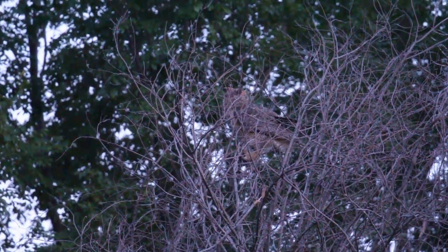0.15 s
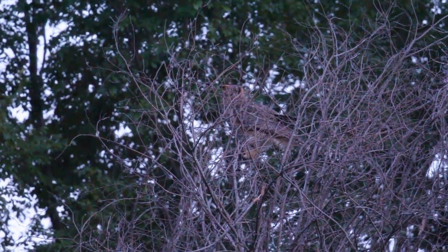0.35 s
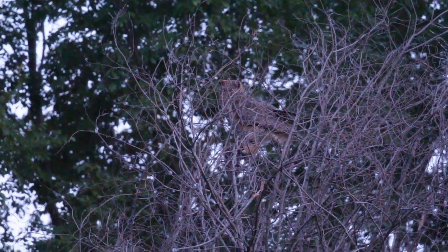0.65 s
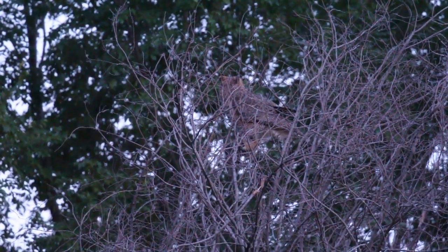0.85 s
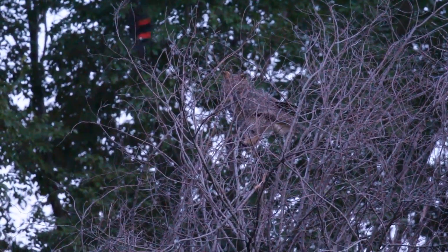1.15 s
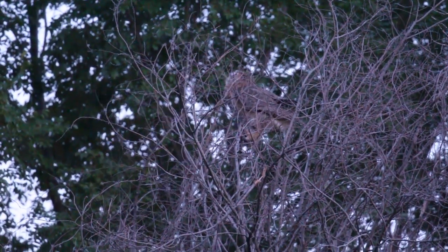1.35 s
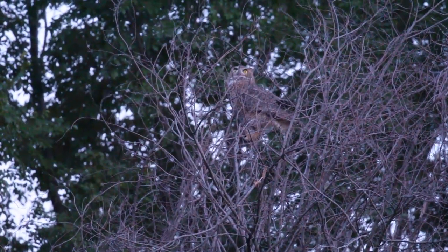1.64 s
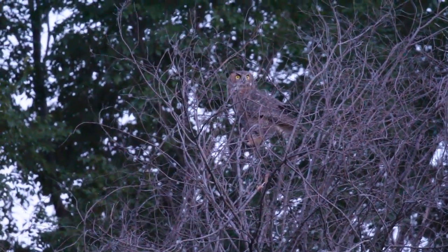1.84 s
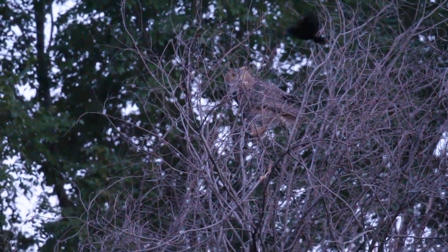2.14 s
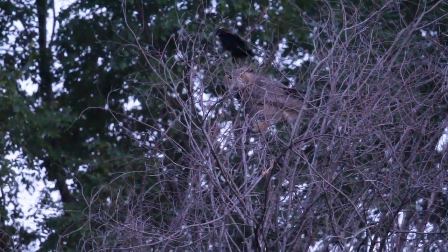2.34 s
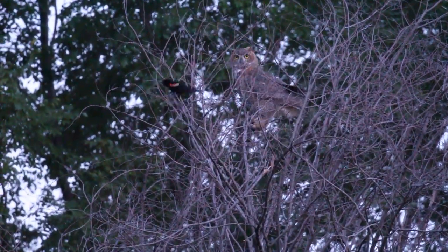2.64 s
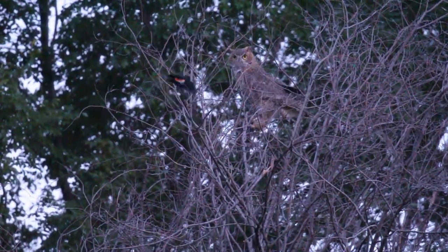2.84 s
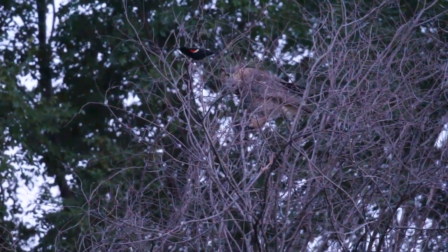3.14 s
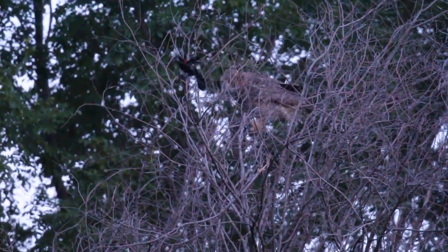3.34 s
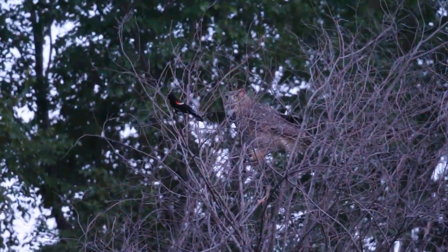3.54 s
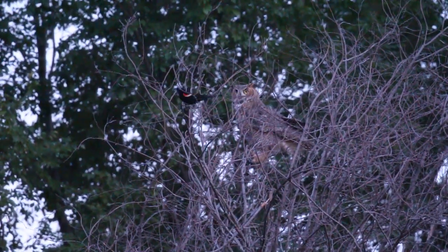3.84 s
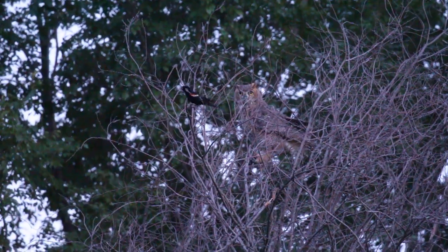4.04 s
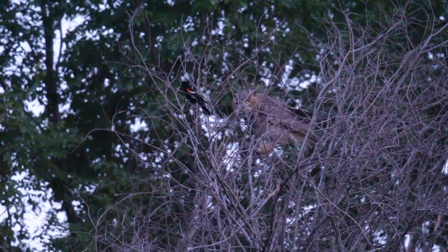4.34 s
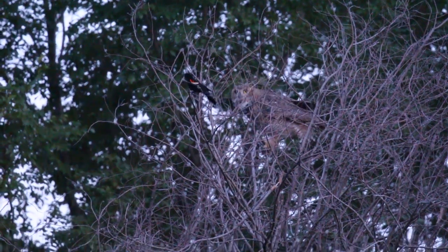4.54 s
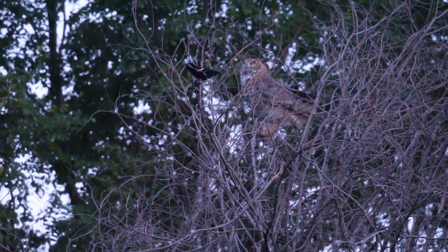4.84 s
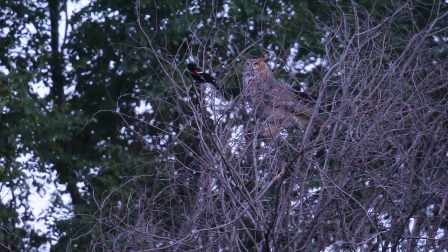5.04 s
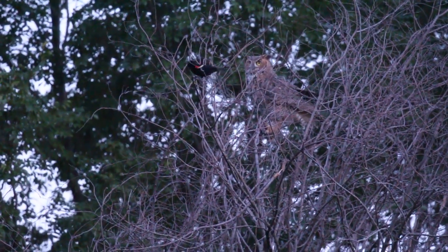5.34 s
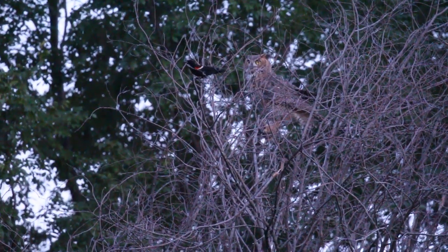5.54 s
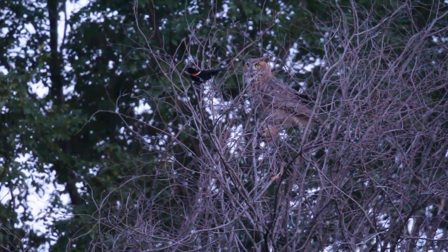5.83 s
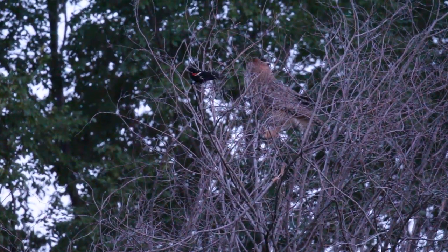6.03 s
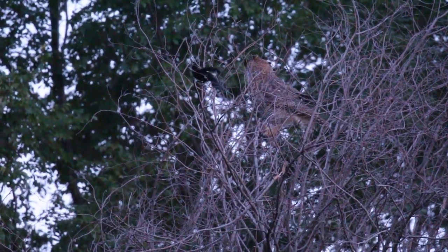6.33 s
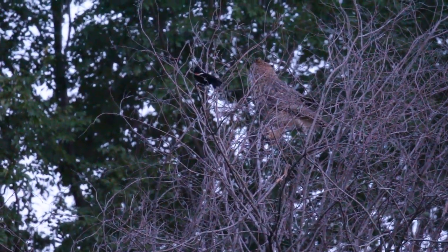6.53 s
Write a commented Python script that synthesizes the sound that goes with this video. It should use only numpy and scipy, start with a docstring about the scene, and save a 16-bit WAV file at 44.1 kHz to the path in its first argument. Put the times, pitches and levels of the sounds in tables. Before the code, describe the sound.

Sharp alarm calls from small birds keep coming in the trees, with occasional buzzy descending whistles, a thin insect trill and soft hum.

```python
"""In the trees near a town, blackbirds and robins mob an owl. Their sharp alarm chips have two voices,
one from each side of the bird's voice box. Dry chucks, thin upward zips, husky slurs and two long
buzzy falling whistles join in, all scattered by the leaves. Behind them the town hums and an insect
trills near 5 kHz with its wings. Twigs rustle, and a few short hollow knocks sound close by."""
import sys
import numpy as np
from scipy import signal
from scipy.fft import rfft, irfft
from scipy.io import wavfile
from scipy.ndimage import uniform_filter1d

SR = 44100
rng = np.random.default_rng(int(sys.argv[2]) if len(sys.argv) > 2 else 0)


def unload_wav(signal):
    """Save mono or channel-first audio to the path in sys.argv[1] as 16-bit WAV at rate SR, clipped to [-1, 1]."""
    wavfile.write(
        sys.argv[1],
        SR,
        np.round(np.clip(np.atleast_2d(signal).T, -1, 1) * 32767).astype(np.int16),
    )


N = 294588


def amp(db):
    """Turns decibels into a gain."""
    return 10 ** (np.asarray(db) / 20)


def unit(x):
    """Scales a signal to an average (rms) size of 1."""
    return x / np.sqrt(np.mean(x ** 2) + 1e-20)


def curve_at(points, hz):
    """Reads between (frequency, value) points on a log-frequency axis."""
    f, value = np.transpose(points)
    return np.interp(np.log(hz + 1), np.log(f), value)


def add(mix, start, sound):
    """Mixes a sound in at a start time in seconds."""
    part = mix[max(round(start * SR), 0):][:len(sound)]
    part += sound[:len(part)]


def play(sounds):
    """Lays (start, sound) pairs on one track."""
    track = np.zeros(N)
    for start, sound in sounds:
        add(track, start, sound)
    return track


def wander(size, hz):
    """A smooth random wobble that moves up to about hz times a second."""
    f = np.fft.rfftfreq(size + SR, 1 / SR)
    return unit(irfft(rfft(rng.standard_normal(size + SR)) * np.exp(-(f / hz) ** 2)))[:size]


def tone(hz):
    """A pure tone that follows a pitch curve."""
    return np.sqrt(2) * np.sin(2 * np.pi * (np.cumsum(hz) / SR + rng.random()))


def foliage(x, near_db, far_db, near_fade_s=.1885, far_fade_s=.736, shared=.59584):
    """Nearby leaves scatter a quick blur; trees farther off return a faint, longer echo."""
    t = np.arange(SR) / SR
    echoes = np.zeros((2, SR))
    for db, fade_s, rise_s in [(near_db, near_fade_s, .003), (far_db, far_fade_s, .03)]:
        taps = rng.standard_normal((3, SR)) * (rng.random((3, SR)) < 3000 / SR)
        taps = np.sqrt(shared) * taps[2] + np.sqrt(1 - shared) * taps[:2]  # some reach both ears
        taps *= amp(-60 * t / fade_s) * (1 - np.exp(-(t / rise_s) ** 2))
        echoes += amp(db) * taps / np.linalg.norm(taps, axis=1, keepdims=True)
    return x + signal.fftconvolve(x[None], echoes, axes=1)[:, :N]


# The hum from bass to treble: f/Hz, relative level/dB
HUM_COLOUR = [(25, -41), (42, -41), (62, -34), (115, -7.5), (160, -15.5), (260, -6.5), (500, -2.5),
              (820, -1.5), (1350, -5.5), (2000, -10.5), (3900, -12), (5600, -19.5), (8000, -26),
              (15500, -34.5)]
# How alike the two ears hear it: f/Hz, likeness (1 = the same)
HUM_LIKENESS = [(60, 1), (130, 0.8887), (290, 0.8637), (640, 0.8405), (1410, 0.6295), (3100, 0.3146),
                (6820, 0.08), (15000, 0.02373)]
# Which side is louder: f/Hz, left minus right level/dB
HUM_BALANCE = [(60, 1), (180, 0.5), (550, 1.0), (1650, 0), (4970, 0.5), (15000, -1)]

def town_hum(level_db=-46.5, patch_db=1.5):
    """Far traffic and leaves: soft noise with drifting louder patches, its bass alike in both ears."""
    frames, hz = N // 512 + 5, np.fft.rfftfreq(2048, 1 / SR)
    a, b, c, d, patches = rng.standard_normal((frames, len(hz), 5)).T
    patches = unit(uniform_filter1d(uniform_filter1d(patches, size=10, axis=0), size=10, axis=1))
    likeness = curve_at(HUM_LIKENESS, hz)[:, None]
    left = a + 1j * b
    right = likeness * left + np.sqrt(1 - likeness ** 2) * (c + 1j * d)
    lean = amp(curve_at(HUM_BALANCE, hz) / 2)[:, None]
    spectra = np.array([left * lean, right / lean])
    spectra *= amp(curve_at(HUM_COLOUR, hz)[:, None] + patch_db * patches)
    return amp(level_db) * unit(signal.istft(spectra, nperseg=2048, noverlap=1536)[1][:, :N])


# One stroke of the insect's wings: t/s, f/Hz, relative level/dB
WING_STROKE = [(0, 4900, -22), (.005, 5020, -5), (.010, 4970, -2), (.015, 4820, -2), (.019, 4690, -4),
               (.025, 4620, -24)]

def insect_trill(strokes_per_s=33.876, level_db=-50.4, flutter_db=1.8, waver=.008):
    """Each wing stroke is a short tone that sags as the wings slow down."""
    at, hz, db = np.transpose(WING_STROKE)
    strokes = (np.arange(N) / SR + .0085) * strokes_per_s + 1 / 4  # begins partway through a stroke
    t = strokes % 1 / strokes_per_s
    pitch = np.interp(t, at, hz) * (1 + waver * wander(N, 178.86))
    return amp(level_db + np.interp(t, at, db) + flutter_db * wander(N, 25.45)) * tone(pitch)


def rasp(start, length, hz, db, width_hz=650, treble_db=-24):
    """A harsh puff of noise around one pitch, as from a throat or a twig."""
    progress = np.arange(0, 1, 1 / (length * SR))
    size = len(progress)
    f = np.fft.rfftfreq(size, 1 / SR)
    peak = np.exp(-((f - hz) / width_hz) ** 2 / 2)
    treble = amp(treble_db) * np.exp(-((f - 1.3956 * hz) / hz) ** 2)
    noise = unit(irfft(rfft(rng.standard_normal(size)) * (peak + treble), size))
    return start, amp(db) * noise * unit(progress ** .9 * (1 - progress) ** 1.088)


# Rustles in the twigs: t/s, length/s, centre f/Hz, level/dB
RUSTLES = [(4.683, .015, 9500, -64), (4.76, .058, 10500, -69.5), (4.851, .028, 10490, -64.5)]

def twig_rustles():
    """Dry twigs give brief, high hisses."""
    return play(rasp(*row, width_hz=3306) for row in RUSTLES)


# The tones in a thud: f/Hz, relative level/dB, fade time/s (to 60 dB quieter)
THUD_TONES = [(503, -16.5, 0.01097), (636.35, 1.5, 0.010831), (1518.2, -3.5, 0.010588),
              (1750.6, -4.5, 0.015278)]
# Close knocks: t/s, ring f/Hz, relative ring level/dB, relative thud level/dB
KNOCKS = [(.3615, 1080, -20, -26.5), (.8678, 978, -28.5, -32), (1.2119, 871, -12, -26.5),
          (1.7662, 777, -28, -30), (1.9199, 1057, -16.5, -16.5), (3.0013, 890, -14.5, -23),
          (3.3563, 1141, -22, -23.5), (3.6411, 1189, -23, -17.5), (4.8479, 881, -22.5, -22.5),
          (5.1008, 1059, -25, -26)]

def knock(start, hz, ring_db, thud_db, rise_s=.00086425, ring_s=.025):
    """A soft tap: a short hollow ring over a dead thud."""
    t = np.arange(SR // 12) / SR
    ring = amp(ring_db - 60 * t / ring_s) * np.sin(2 * np.pi * hz * t)
    thud = sum(amp(thud_db + db - 60 * t / fade_s) * np.cos(2 * np.pi * f * (t - rise_s))
               for f, db, fade_s in THUD_TONES)
    return start, (ring + thud) * (1 - np.exp(-(t / rise_s) ** 2))


# The tone colour of the calls: f/Hz, change in level/dB
CALL_COLOUR = [(1500, -2.5), (2600, .4), (4200, -.7), (5700, 1), (6750, -3), (7600, -0.5), (9200, -7.5),
               (10600, -2.5), (12000, -10.5), (15000, -6)]

def colour_calls(x):
    """Gives the calls their tone colour, with peaks and dips in the treble."""
    return irfft(rfft(x) * amp(curve_at(CALL_COLOUR, np.fft.rfftfreq(N, 1 / SR))), N)


def slide(start, length, from_hz, to_hz, db):
    """A thin sliding call with a weaker voice below it: clear if it rises, husky if it falls."""
    progress = np.arange(0, 1, 1 / (length * SR))
    shake = .016 if to_hz > from_hz else .08182
    hz = (from_hz + (to_hz - from_hz) * progress) * (1 + shake * wander(len(progress), 728.2))
    return start, amp(db) * unit(np.sin(np.pi * progress)) * (tone(hz) + amp(-11) * tone(.78 * hz))


def far_chatter(calls=10, span_s=1.5):
    """Birds farther off toss in faint slides at random, then fall quiet."""
    return play(slide(.25 + when * span_s, .014 + .05 * length,
                      from_hz=2500 + 1400 * first, to_hz=3300 + 1300 * last, db=-57 - 6 * far)
                for when, length, first, last, far in rng.random((calls, 5)))


# When a distant bird calls: t/s
SLUR_TIMES = [.53, 4.24, 5.611]

def far_slurs():
    """A distant bird repeats one husky falling note."""
    return play(slide(start, length=.1, from_hz=2720, to_hz=1950, db=-53.5) for start in SLUR_TIMES)


# Upward zips: t/s, length/s, starting f/Hz, relative level/dB
ZIPS = [(.293, .052, 3350, -49), (.481, .026, 3300, -51), (.592, .025, 3000, -48), (.594, .021, 4400, -49),
        (.697, .02, 3400, -43), (.822, .024, 4200, -49.5), (1.065, .04, 3200, -53), (1.13, .04, 3200, -53),
        (1.175, .035, 3150, -49), (1.347, .044, 3200, -45), (1.554, .022, 4200, -51),
        (1.617, .047, 5600, -53), (1.636, .018, 3400, -48.5), (3.073, .015, 5400, -49),
        (5.038, .016, 5000, -48.5), (6.196, .018, 5600, -54)]

def zips():
    """Thin rising calls; the quicker they are, the further they climb."""
    return play(slide(start, length, hz, hz * (1 + .7 * np.exp(-length / .045)), db)
                for start, length, hz, db in ZIPS)


# Dry chucks: t/s, relative level/dB
CHUCKS = [(1.719, -41.5), (2.069, -43.5), (3.502, -42.5), (4.107, -42.5), (4.453, -45), (4.851, -42.5),
          (5.403, -42), (6.03, -40)]

def chucks():
    """Harsh bursts shaped by the bird's throat."""
    return play(rasp(start, length=.045, hz=3600, db=db) for start, db in CHUCKS)


# Falling whistles: t/s, f/Hz before swoop and sag, relative level/dB, buzz depth/Hz
WHISTLES = [(2.305, 3490, -32, 255), (6.465, 3500, -35, 350)]

def whistle(start, base_hz, db, depth_hz, buzz_hz=300.89, step_at_s=.276, step_s=.011):
    """A note swoops down, sags, then steps lower and fades; a fast buzz shakes its pitch and level."""
    t = np.arange(0, .44, 1 / SR)
    high = base_hz * (1 + .33 * np.exp(-(t / .054) ** 2)) - 1000 * t
    overshoot = .07 * np.exp(-((t - step_at_s) / .035 - 1) ** 2)
    low = base_hz * .725 * (1 - overshoot)
    melody = high + (low - high) / (1 + np.exp((step_at_s - t) / step_s))
    since_step = np.maximum(t - step_at_s + step_s, 0)
    depth = depth_hz * np.exp(-(since_step / .095) ** 2)  # the buzz calms on the lower note
    level = amp(db - 95 * since_step) * np.minimum(t / .05, 1)
    buzz = tone(buzz_hz * (1 + .0108 * wander(len(t), 40.53))) / np.sqrt(2)
    hz = melody + depth * (buzz + .19 * wander(len(t), 595))
    voice = sum(amp(part_db) * tone(k * hz) for k, part_db in enumerate([0, -26, -30, -39], 1))
    throb = 1 + .1475 * buzz * depth / buzz_hz
    return start, level * throb * voice


# The two birds' voices: climb time factor, pitch droop share, hoarseness of the fall, brightness/dB
BIRD_VOICES = [(1, .03, .065, 0), (1.25, .013, .14, -5)]
# Their habits: relative level/dB of the fall, upper voice level/dB against the lower
BIRD_LEVELS = [(-43, -15.3), (-39.5, -14.5)]
# A chip's climb: t/s from the top (before the time factor), then pitch factor and relative level/dB
# for the lower voice, and the same two for the upper
CHIP_CLIMB = [(-.026, .42, -22, .85, -18), (-.02, .52, -12, .98, 1), (-.012, .74, -7, 1.33, 3),
              (-.005, .92, -6, 1.5, 3)]
# A chip's fall: t/s after the hold, pitch factor, relative level/dB
CHIP_FALL = [(.005, .74, 0), (.012, .62, 3), (.021, .48, -6), (.028, .41, -24)]
# Alarm chips: t/s at the top of the climb, hold/s, f/Hz, bird (0 or 1), relative level/dB
ALARM_CHIPS = [(.154, .032, 4110, 0, -37), (.654, .039, 3960, 1, -39), (.718, .036, 4100, 0, -36),
               (1.226, .036, 4050, 0, -37.5), (1.428, .041, 3840, 1, -39.5), (1.811, .04, 4140, 0, -34),
               (1.986, .037, 3990, 1, -41), (2.179, .033, 3990, 1, -38), (2.275, .034, 4145, 0, -36),
               (2.339, .034, 3950, 1, -37.5), (2.705, .042, 3980, 1, -42), (2.784, .041, 4120, 0, -35),
               (3.127, .036, 3980, 1, -38), (3.199, .036, 4090, 0, -35.5), (3.254, .041, 3845, 1, -40),
               (3.617, .04, 4055, 0, -36.5), (3.672, .042, 3995, 1, -42), (4.01, .038, 3900, 1, -40.5),
               (4.059, .04, 4115, 0, -36), (4.575, .038, 4105, 0, -36), (4.706, .04, 3995, 1, -41.5),
               (4.809, .036, 3850, 1, -38), (5.08, .037, 4080, 0, -35.5), (5.546, .039, 4000, 0, -36),
               (6.0, .033, 4035, 0, -36.5), (6.041, .042, 3940, 1, -38), (6.407, .039, 3905, 1, -36),
               (6.567, .029, 4140, 0, -36.5)]

def alarm_chip(top_s, hold, hz, bird, held_db, waver=.007, flutter_db=1.5):
    """Both sides of the voice box climb together, hold and drop; the upper voice fades away first."""
    stretch, droop, rough, bright_db = BIRD_VOICES[bird]
    fall_db, upper_db = BIRD_LEVELS[bird]
    before, low, low_db, high, high_db = np.transpose(CHIP_CLIMB)
    after, drop, drop_db = np.transpose(CHIP_FALL)
    t = np.arange(stretch * before[0], hold + after[-1], 1 / SR)
    # each curve below runs through climb, hold and fall
    times = np.r_[stretch * before, hold * np.array([.06, .3, .75, 1]), hold + after]
    lower_hold = 1 + droop * np.array([.9, 1, -.5, -1])
    upper_hold = 6733.5 * np.sqrt(hz / 4070) * np.array([.97, 1.01, 1, .99])
    lower = np.interp(t, times, hz * np.r_[low, lower_hold, drop])
    upper = np.interp(t, times, np.r_[hz * high, upper_hold, 6733.5 * np.sqrt(drop)])
    # hoarse at first, pure while it holds, hoarse again as it drops
    hoarse = rough * np.clip((t - hold) / .0113, 0, 1) + .04 * np.clip(t / t[0], 0, 1)
    for pitch in (lower, upper):
        pitch *= 1 + waver * wander(len(t), 251.96) + hoarse * wander(len(t), 701.55)
    lower_level = np.interp(t, times, np.r_[held_db + np.r_[low_db, -3, .5, 1.5, -1.5], fall_db + drop_db])
    upper_shape = np.interp(t, times, np.r_[high_db + bright_db, 1, 1.5, -1.5, -3, drop_db - 16])
    lower_gain = amp(lower_level + flutter_db * wander(len(t), 180))
    upper_gain = amp(held_db + upper_db + upper_shape + flutter_db * wander(len(t), 180))
    push = amp(bright_db) * np.exp(-(t / .018675) ** 2)  # hardest at the top, where overtones show
    overtones = amp(-24) * tone(2 * lower) + amp(-23) * tone(3 * lower)
    voices = lower_gain * (tone(lower) + push * overtones) + upper_gain * tone(upper)
    # the voices shake each other, adding faint tones at their sum and difference
    holding = np.interp(t, [-.006, .004, hold, hold + .004], [0, 1, 1, 0])
    voices += upper_gain * amp(-15) * (tone(lower + upper) + holding * tone(upper - lower))
    _, scrape = rasp(0, length=.03803, hz=hz, db=bright_db - 49, width_hz=1051.2, treble_db=-14.5)
    add(voices, 0, scrape)
    return top_s + t[0], voices


def scene():
    """Sends the calls, twigs, knocks and insect through the leaves and lays them over the hum."""
    chips = colour_calls(amp(-1.6) * play(alarm_chip(*row) for row in ALARM_CHIPS))
    chips = foliage(chips, near_db=-2, far_db=-7.5, near_fade_s=.14, far_fade_s=.75, shared=.1)
    chips *= amp([[-.4], [.4]])  # left and right, in dB
    whistles = colour_calls(amp(-2) * play(whistle(*row) for row in WHISTLES))
    whistles = foliage(whistles, near_db=-3, far_db=-10)
    calls = chucks() + zips() + far_slurs() + far_chatter()
    twig_tick = play([rasp(start=5.303, length=.006, hz=3077, db=-42)])
    small_sounds = colour_calls(amp(.5) * (calls + twig_tick))
    small_sounds = foliage(small_sounds, near_db=-2, far_db=-7, shared=.3196)
    rustles = foliage(twig_rustles(), near_db=-1.5, far_db=-11.5, shared=.1001)
    knocks = foliage(play(knock(*row) for row in KNOCKS), near_db=-13, far_db=-14.5)
    # cuts the bass below 200 Hz, so the knocks sound light
    bass_cut = signal.butter(2, 200, "highpass", fs=SR, output="sos")
    knocks = signal.sosfilt(bass_cut, knocks) * amp([[1.3], [-1.4]])
    insect = foliage(insect_trill(), near_db=-5, far_db=-11.5, shared=.1) * amp([[-1.2], [.8]])
    return town_hum() + insect + rustles + knocks + small_sounds + whistles + chips


def record(dry):
    """Cuts the highest treble, above 15.7 kHz."""
    treble_cut = signal.firwin(511, 15700, window=("kaiser", 9), fs=SR)
    return signal.oaconvolve(dry, treble_cut[None], "same")


dry = scene()
out = record(dry)
unload_wav(out)
```